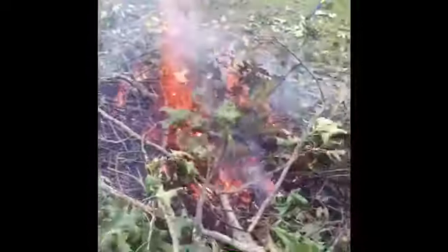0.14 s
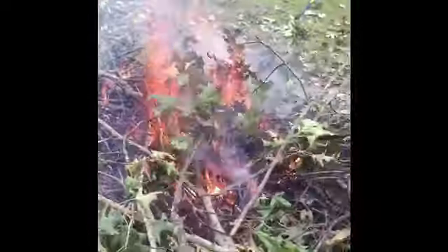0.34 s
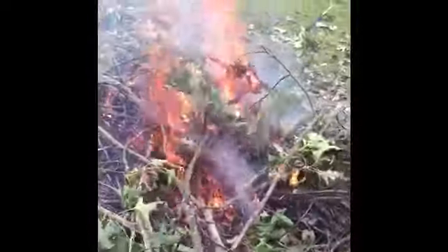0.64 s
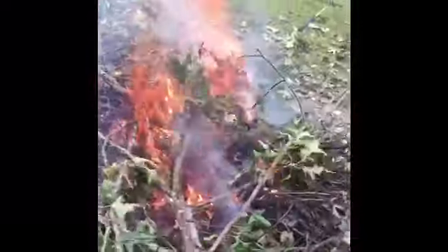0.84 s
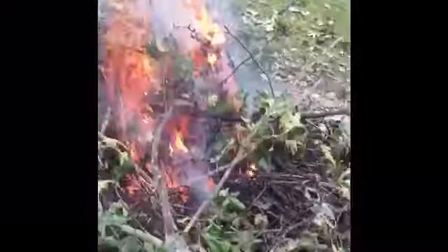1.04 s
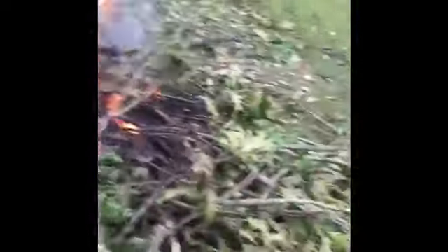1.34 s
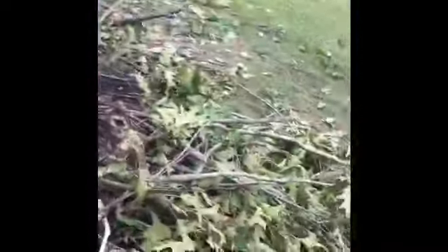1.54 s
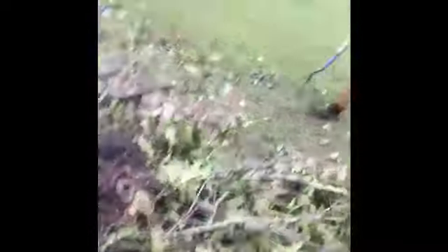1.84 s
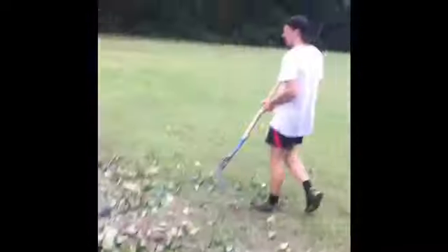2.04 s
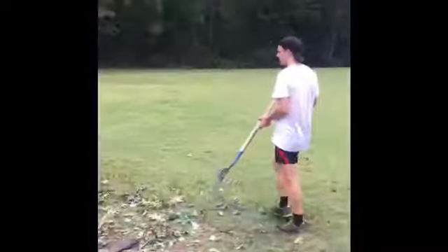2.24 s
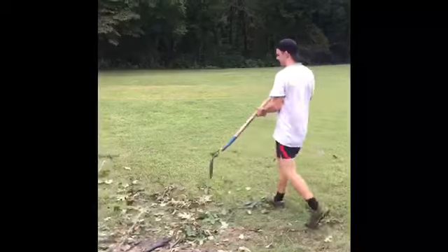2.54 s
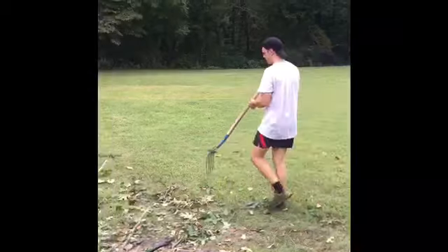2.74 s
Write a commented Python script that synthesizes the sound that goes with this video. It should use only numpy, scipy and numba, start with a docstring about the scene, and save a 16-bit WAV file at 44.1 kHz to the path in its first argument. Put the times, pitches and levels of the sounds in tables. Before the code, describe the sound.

Burning green branches crackle and hiss up close, wind gusts buffeting midway, then sharper separate pops

```python
"""A pile of green leafy branches burns outdoors: sap cells burst in a dense crackle of short rings over a
steam hiss of noise bands. From the start gusts buffet the microphone of a close hand-held phone, as
band noise hardest near 1.1-1.2 s, and louder single pops stand out. The phone turns away from the fire
halfway: the fire weakens from about 1.6 s and its hiss sinks under the crackle from 1.5 to 2.3 s."""
import sys
import numpy as np
from scipy import signal
from scipy.fft import rfft, irfft
from scipy.io import wavfile
from scipy.ndimage import uniform_filter1d, map_coordinates
from numba import njit

SR = 44100
rng = np.random.default_rng(int(sys.argv[2]) if len(sys.argv) > 2 else 0)


def level_to_linear(level):
    """Convert decibel levels to linear amplitude factors, elementwise."""
    exponent = np.asarray(level, float) / 20
    return 10 ** exponent


def master(y):
    """Save y as 16-bit WAV."""
    cut = np.clip(np.atleast_2d(y).T, -1, 1)
    pcm = np.round(cut * 32767)  # scale
    wavfile.write(sys.argv[1], SR, pcm.astype(np.int16))


N = 127890


def unit(x):
    """Scale to rms 1."""
    return x / np.sqrt(np.mean(x ** 2))


def curve(table, index):
    """One column of a table, interpolated over time."""
    rows = np.array(table, float)
    return np.interp(np.arange(N) / SR, rows[:, 0], rows[:, index])


def shape(x, gain_db):
    """Minimum-phase filter whose dB gain is a function of Hz."""
    hz = np.arange(1025) * SR / 2048
    cepstrum = irfft(np.log(level_to_linear(gain_db(np.maximum(hz, 1.)))))
    cepstrum[1:1024] *= 2  # fold onto positive time: causal
    cepstrum[1025:] = 0
    impulse = irfft(np.exp(rfft(cepstrum)))[:1024]
    return signal.fftconvolve(x, impulse)[:N]


def band(x, low_hz, high_hz):
    """Steep band-pass."""
    edges_hz = [low_hz, min(high_hz, .45 * SR)]
    return signal.sosfilt(signal.butter(3, edges_hz, "band", fs=SR, output="sos"), x)


def high_pass(x, order, hz):
    """Butterworth low cut."""
    return signal.sosfilt(signal.butter(order, hz, "high", fs=SR, output="sos"), x)


def walk(rate_hz):
    """Random levels 1 / rate_hz apart, joined by straight lines; spread 1."""
    points = rng.standard_normal(2000)
    line = map_coordinates(points, [np.arange(N) / SR * rate_hz], order=1)
    return line / line.std()


@njit
def grains(start, hz, cycles, size, tail, tail_s, noise):
    """Each grain is a ring dying within some cycles, kept going by a fading spit of noise."""
    out = np.zeros(len(noise))
    for g in range(len(start)):
        w = 2 * np.pi * hz[g] / SR
        pole = np.exp(1j * w - w / (2 * np.pi * cycles[g]))
        ring = size[g] * (.6 + .8j)
        spit = size[g] * tail[g]
        i = start[g]
        fade = np.exp(-1 / (tail_s[g] * SR))
        push = np.sqrt(2 - 2 * abs(pole) ** 2)
        while i < len(out) and abs(ring) + abs(spit) > .003 * abs(size[g]):
            out[i] += ring.imag
            ring = ring * pole + 1j * push * spit * noise[(i + 7919 * g) % len(noise)]
            spit *= fade
            i += 1
    return out


def crackle():
    """Sap cells: dense random bursts of every pitch and size up to a limit, in quick flurries."""
    bursts_per_s = 1400
    spread_db, top_db, flurry_db, flurry_hz = 6.2, 17, 1.3, 29.51
    shortest_cycles, cycles_range_db = .28364, 10.7
    spit_db, spit_range_db = -23, 8
    shortest_spit_s, spit_s_range_db = .0007, 8.5
    when, pitch, rarity, sign, ringing, spitting = rng.random((int(bursts_per_s * N / SR), 6)).T
    start = (when * N).astype(np.int64)
    hz = 900 + 15000 * pitch
    size_db = top_db * np.tanh(-spread_db * np.log(rarity) / top_db)  # exponential, soft limit
    size_db = size_db + flurry_db * walk(flurry_hz)[start]
    size = level_to_linear(size_db) * np.sqrt(hz / 8000) * np.sign(sign - .5)
    cycles = shortest_cycles * level_to_linear(cycles_range_db * ringing)
    spit = level_to_linear(spit_db + spit_range_db * (spitting - .5))
    spit_s = shortest_spit_s * level_to_linear(spit_s_range_db * spitting)  # louder spits last longer
    return unit(grains(start, hz, cycles, size, spit, spit_s, rng.standard_normal(N)))


def hiss():
    """Steam from wet leaves: octave bands of noise that flicker together and alone."""
    together_db, alone_db = .3, .72
    together = walk(38.66)
    out = 0
    for low_hz in 250 * 2. ** np.arange(7):
        flicker_db = together_db * together + alone_db * walk(20)
        out = out + level_to_linear(flicker_db) * band(rng.standard_normal(N), low_hz, 2 * low_hz)
    return unit(out)


def fire():
    """Bed of crackle and hiss sharing colour and level; the hiss sinks once the phone has turned."""
    # level of the bed: t/s, level/dB
    fire_level = [(0, -25), (.12, -22), (.22, -22.5), (.4, -24), (.6, -23.5), (.7, -23.5), (.85, -23),
                  (1.05, -24), (1.22, -22.5), (1.34, -23.5), (1.42, -21.5), (1.54, -22.5), (1.62, -26.5),
                  (1.85, -25), (2.1, -26), (2.35, -25), (2.5, -25.5), (2.6, -25.5), (2.9, -28)]
    # colour of the bed: f/Hz, gain/dB
    fire_colour = [(210, -7.5), (350, -47), (500, -12.5), (700, -9.5), (1300, -5.5), (2600, -3.5),
                   (5500, -2), (10000, -1.5), (13000, -2.5), (16000, -4.5)]
    crackle_db, hiss_db = -4.5, -3.5
    colour_hz, colour_db = np.array(fire_colour, float).T
    sink_db = curve([(1.5, 0), (2.3, -5)], index=1)  # t/s, level/dB
    mix = level_to_linear(crackle_db) * crackle() + level_to_linear(hiss_db + sink_db) * hiss()
    bed = unit(shape(mix, lambda hz: np.interp(np.log(hz), np.log(colour_hz), colour_db)))
    return bed * level_to_linear(curve(fire_level, index=1))


def wind():
    """Eddies on the microphone port: one lumpy turbulence in three evened bands, plus a rasp."""
    # gusts: t/s, bass level/dB, low-middle level/dB, middle level/dB
    gusts = [(0.0, -29.5, -40, -41), (0.04, -29.5, -30, -49), (0.1, -43, -66, -54), (0.12, -45, -54, -54),
             (0.15, -33, -62, -52), (0.18, -41.5, -55, -62), (0.43, -40, -49, -48), (0.44, -57, -36, -48),
             (0.47, -25.5, -31, -48), (0.49, -26, -38.5, -59), (0.6, -27, -29.5, -35),
             (0.62, -58, -34, -57), (0.65, -16, -34, -41.5), (0.69, -47, -41, -58), (0.8, -35.5, -47, -52),
             (0.83, -33, -42, -43.5), (0.85, -29, -25.5, -43), (0.88, -35, -58, -71),
             (0.96, -29, -27.5, -44), (0.98, -24, -31.5, -66), (1.0, -31, -23.5, -25.5),
             (1.04, -26, -33.5, -67), (1.07, -22, -22, -28), (1.08, -29, -43, -57), (1.1, -11, -26, -33),
             (1.12, -22.5, -21, -44), (1.14, -20, -29, -27.5), (1.175, -23, -28, -61),
             (1.193, -11, -13.5, -22), (1.205, -18.5, -22.5, -29), (1.225, -20, -12, -13.5),
             (1.245, -23, -41, -61), (1.28, -27.5, -29, -53), (1.32, -17, -25.5, -38),
             (1.36, -27, -44, -66), (1.4, -33, -31.5, -57), (1.44, -19.5, -32, -71), (1.48, -40, -45, -57),
             (1.58, -33.5, -43, -58), (1.615, -48, -49, -55), (1.66, -29, -50, -47),
             (1.735, -26.5, -42.5, -55), (1.8, -47, -52.5, -50), (1.87, -27, -45, -51),
             (1.93, -27, -41, -45), (1.958, -23.5, -25.5, -40), (1.985, -31.5, -47, -56),
             (2.08, -38.5, -47, -50), (2.1, -31.5, -45, -49), (2.24, -36, -47.5, -54),
             (2.38, -44, -50, -47.5), (2.72, -44.5, -49.5, -53), (2.75, -36.5, -48, -42),
             (2.78, -41, -47, -51), (2.9, -36, -47.5, -49)]
    # bands of the three levels: low f/Hz, high f/Hz
    gust_bands = [(48, 130.8), (145, 290), (350, 790)]
    eddy_db, eddies_per_s, even_cycles = 2.5, 50, 3
    rasp_band_hz, rasp_db, rasp_growth = (1000, 4500), 3, 1.8  # growth: dB per dB of the middle band
    air = rng.standard_normal(N)
    lumps = level_to_linear(eddy_db * walk(eddies_per_s))
    rasp = unit(band(air, *rasp_band_hz) * lumps)
    out = rasp * level_to_linear(rasp_db + rasp_growth * curve(gusts, index=3))
    for k, (low_hz, high_hz) in enumerate(gust_bands):
        eddies = band(air, low_hz, high_hz)
        window = int(even_cycles * SR / np.sqrt(low_hz * high_hz))
        power = uniform_filter1d(eddies ** 2, window)
        eddies = eddies / np.sqrt(power + .03 * np.mean(eddies ** 2))  # steady over a few cycles
        out = out + unit(eddies * lumps) * level_to_linear(curve(gusts, index=k + 1))
    return out


def pops():
    """Loud single bursts: very short rings, each with its own pitch and spitting tail."""
    # pops: t/s, strength/dB, centre f/Hz, spitting tail re strength/dB
    bursts = [(0.0444, -4, 11200, -28), (0.1314, -5, 9300, -20), (0.2059, 0, 10700, -18),
              (0.2157, -2, 6200, -16), (0.2537, -8, 7800, -10), (0.2741, -4, 4900, -14),
              (0.2829, -4, 8500, -20), (0.3552, -6, 4100, -10), (0.3582, -5, 10900, -13),
              (0.3941, -4, 5600, -28), (0.4584, -7, 7900, -24), (0.5155, -5, 7700, -29),
              (0.5204, -8, 8000, -29), (0.5827, -6, 7300, -30), (0.6192, -3, 10500, -20),
              (0.6249, -7, 7400, -18), (0.6386, -2, 8600, -19), (0.6398, -5, 10000, -21),
              (0.6521, -7, 9400, -17), (0.6733, -2, 6300, -23), (0.7794, -5, 5500, -29),
              (0.795, -5, 9500, -20), (0.8294, -2, 10800, -30), (0.8381, -3, 8100, -24),
              (0.8611, -5, 8400, -29), (0.928, -5, 9800, -21), (0.9605, -3, 8100, -27),
              (1.0438, -6, 7500, -16), (1.1153, 0, 7000, -17), (1.2109, -5, 8300, -20),
              (1.4696, -6, 4900, -11), (1.5361, -6, 5800, -29), (1.5391, -4, 9600, -29),
              (1.5684, -7, 6300, -15), (1.6907, -5, 10300, -14), (1.7553, -4, 8000, -17),
              (1.9, -1, 10000, -21), (1.9146, -4, 9300, -24), (1.9402, -8, 10800, -27),
              (1.9891, -6, 9300, -19), (2.0054, -8, 5200, -16), (2.0089, -6, 7200, -24),
              (2.0226, -11, 6100, -14), (2.0266, -3, 8200, -16), (2.0637, -6, 5700, -16),
              (2.102, -9, 9100, -19), (2.1153, -8, 6900, -30), (2.1516, -6, 8200, -16),
              (2.1609, -11, 7300, -26), (2.1826, -3, 10000, -26), (2.2005, -11, 6400, -26),
              (2.2124, -8, 8600, -30), (2.2598, -12, 6300, -13), (2.271, -11, 4800, -19),
              (2.2836, -7, 4100, -10), (2.3191, -6, 11400, -30), (2.3282, -6, 4200, -16),
              (2.344, -8, 6000, -17), (2.3579, -6, 8400, -21), (2.3621, -10, 5300, -20),
              (2.3694, -6, 8500, -15), (2.3893, 2, 8600, -21), (2.4133, -7, 6700, -28),
              (2.4589, -9, 9400, -30), (2.4705, 3, 10100, -22), (2.4717, -3, 6000, -24),
              (2.5099, -10, 7300, -27), (2.5184, -5, 8900, -22), (2.5396, -6, 8500, -27),
              (2.6249, -4, 7900, -24), (2.6479, -10, 8800, -28), (2.6621, -10, 5800, -17),
              (2.7056, -10, 7400, -17), (2.7341, -11, 8700, -18), (2.751, -10, 7200, -30),
              (2.7552, -4, 6900, -11), (2.7663, -10, 5400, -20), (2.7893, -4, 6000, -25),
              (2.8272, -8, 5800, -20), (2.8393, -2, 8900, -24), (2.863, -9, 3100, -15),
              (2.8912, -4, 10000, -22)]
    cycles, tail_s, low_cut_hz = .7, .0017, 1300
    edge = .5  # share of the sharp leading edge, lifts the treble
    t_s, strength_db, hz, tail_db = np.array(bursts, float).T
    one = np.ones(len(t_s))
    start = (t_s * SR).astype(np.int64)
    out = grains(start, hz, cycles * one, level_to_linear(strength_db), level_to_linear(tail_db), tail_s * one,
                 rng.standard_normal(N))
    return high_pass(out + edge * np.diff(out, prepend=0), 2, low_cut_hz)


def scene():
    """Fire, wind and pops at one microphone."""
    return (fire() + wind() + pops())[None]


def low_pass(x):
    """Removes everything above the highest recorded frequency."""
    return signal.sosfilt(signal.butter(12, 17030, fs=SR, output="sos"), x)


def record(dry):
    """The phone's case cuts narrow dips into the treble; then low cut and steep top cut."""
    # case dips: f/Hz, width/Hz, gain/dB
    case_dips = [(4850, 170, -4), (7550, 1160, -2.5), (10370, 660, -5)]
    low_cut_hz, top_cut_hz = 42, 15720

    def dips_db(hz):
        return sum(db * np.exp(-((hz - f) / w) ** 2 * 2) for f, w, db in case_dips)

    x = high_pass(shape(dry[0], dips_db), 3, low_cut_hz)
    x = signal.sosfilt(signal.ellip(12, .2, 85, top_cut_hz, fs=SR, output="sos"), x)
    return low_pass(x[None])


dry = scene()
out = record(dry)
master(out)
```